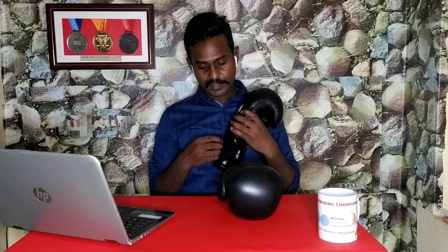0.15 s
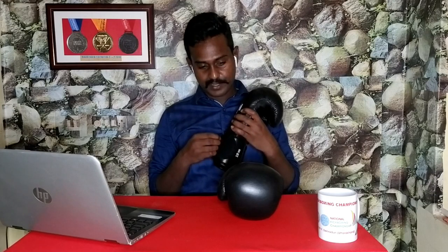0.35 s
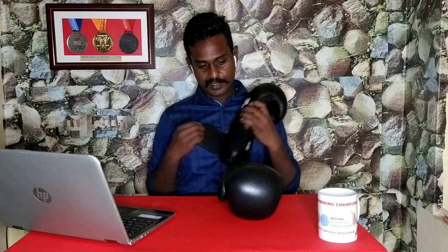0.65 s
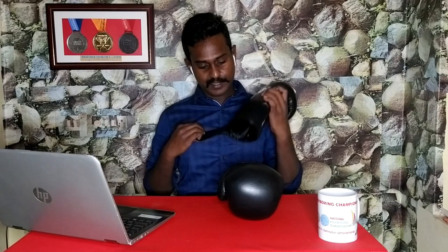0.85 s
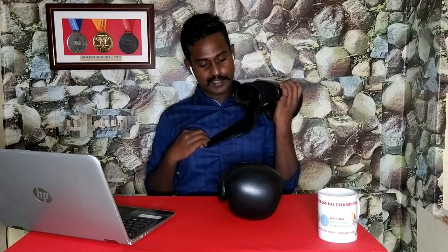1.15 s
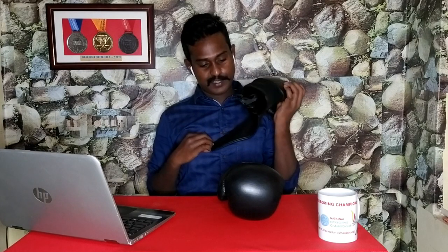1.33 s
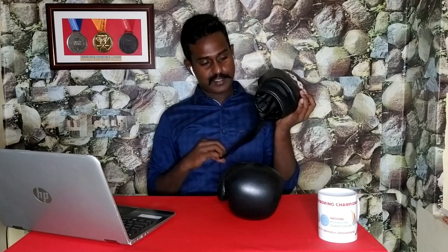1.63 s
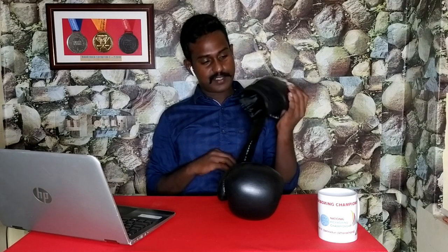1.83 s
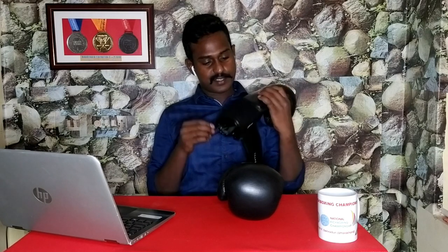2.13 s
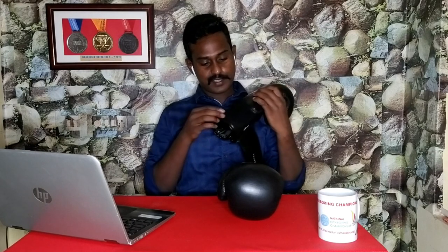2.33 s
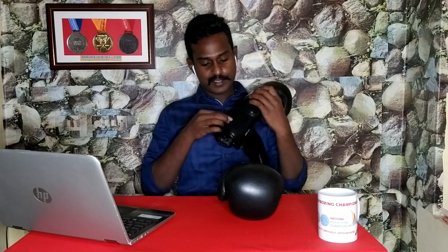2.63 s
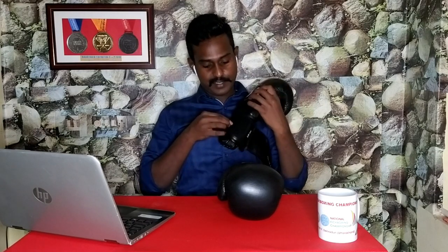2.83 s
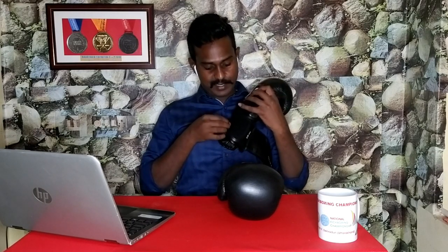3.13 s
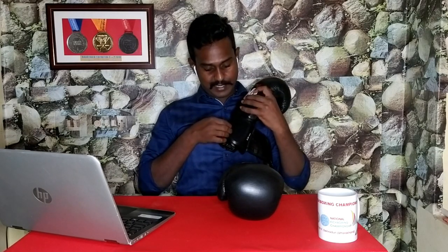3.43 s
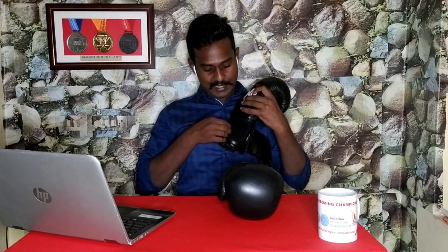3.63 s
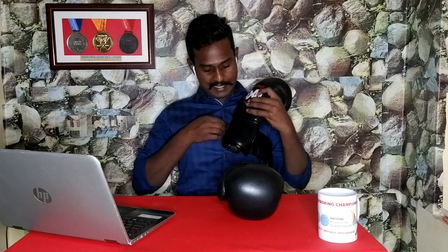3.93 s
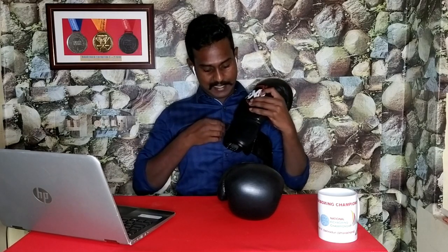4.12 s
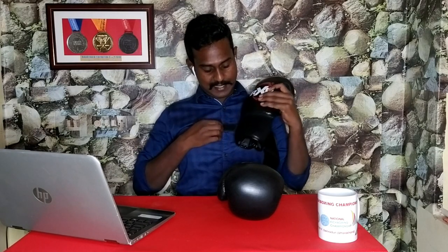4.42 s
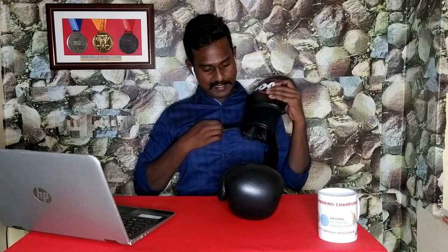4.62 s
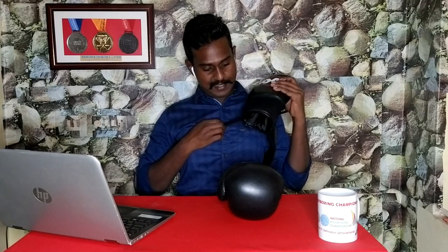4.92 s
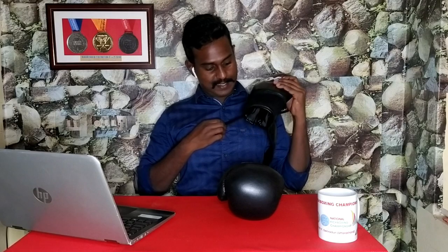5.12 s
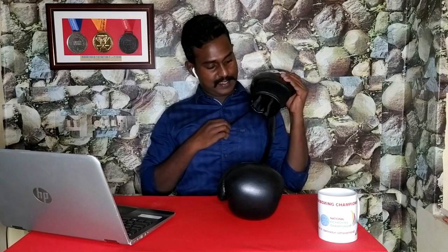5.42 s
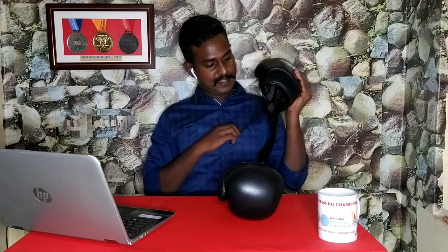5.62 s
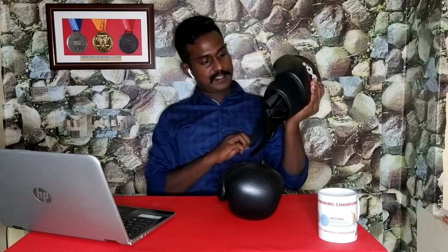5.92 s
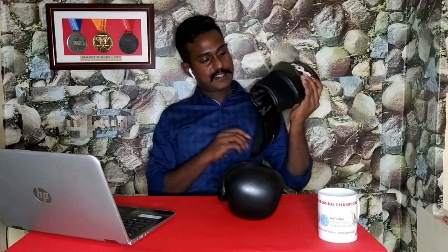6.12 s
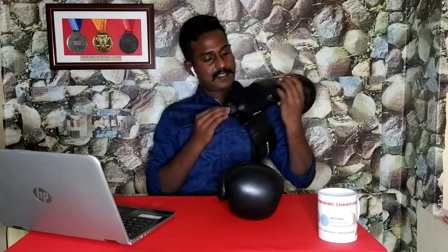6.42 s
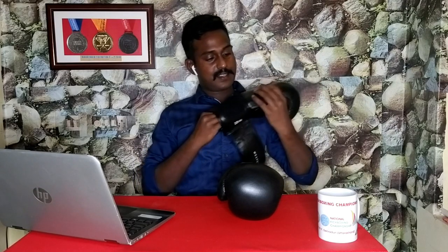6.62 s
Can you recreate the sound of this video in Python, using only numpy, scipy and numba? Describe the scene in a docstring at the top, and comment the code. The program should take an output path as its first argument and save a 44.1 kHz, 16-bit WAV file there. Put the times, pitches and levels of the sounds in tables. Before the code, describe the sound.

The hook-and-loop wrist strap of a boxing glove catches with a few sharp pops, then tears open in a crackling rip of about a second. Faint finger taps and rustles follow as the glove is handled. A second, longer rip comes in uneven tugs and thins out. The microphone listens from across a table in a small, hard-walled room with a faint low drone.

```python
"""A boxing glove's hook-and-loop wrist strap is ripped open twice, in a string of tugs.
Thousands of hooks snap free; each ticks, flicks the strap and thumps the padded cuff.
Single hooks pop before, during and between tugs; around the rips the glove is handled softly.
Small hard-walled room with a low steady drone; a two-port phone listens from across the table."""
import sys
import numpy as np
from scipy import signal
from scipy.fft import rfft, irfft
from scipy.io import wavfile
from scipy.ndimage import uniform_filter1d
from numba import njit

SR = 44100
rng = np.random.default_rng(int(sys.argv[2]) if len(sys.argv) > 2 else 0)


def put_to_file(sound):
    """Save the sound as 16-bit audio at rate SR, in the file named by the first command-line argument."""
    columns = np.atleast_2d(sound).T  # one column per channel
    safe = np.clip(columns, -1, 1)
    whole_steps = np.round(safe * 32767)
    wavfile.write(sys.argv[1], SR, whole_steps.astype(np.int16))


N = 298111
TOP_HZ = 15800
TIME, FREQ = np.arange(N) / SR, np.fft.rfftfreq(N, 1 / SR)
LEFT_RIGHT = np.array([[1], [-1]])

# strap tugs: t/s, build/s, hold/s, ease/s, level/dB, flap re level/dB, cuff re level/dB, stubborn/(1/s)
TUGS = [ (0.206, .003, 0.023, 0.032, -51, 1.5, -3, 10), (0.298, 0.018, 0.0052, 0.05, -44, -2, -9, 5),
        (0.336, .006, 0.018, .04, -43, -5, -9, 5), (0.368, 0.011, 0.009, 0.047, -34, -5, -12, 80),
        (0.508, 0.041, 0.017, 0.19, -28, -8, -12.5, 90),
        (0.692, 0.084, 0.0089, 0.054, -23, -9.5, -13.5, 40), (0.78, 0.013, 0.14, 0.091, -33, -0.5, -12, 40),
        (1.012, 0.0089, 0.013, 0.18, -31, -7, -15, 50), (1.105, 0.025, 0.048, 0.12, -30.5, -6, -14, 20),
        (1.187, 0.02, 0.0093, .03, -30, -1, -9.5, 10), (3.69, .004, 0.12, 0.3, -45.5, -5.5, -16.5, 15),
        (3.817, 0.016, 0.11, 0.15, -29, -6.5, -15.5, 80), (3.945, 0.031, 0.074, 0.07, -30, -10, -13.5, 25),
        (4.094, .018, 0.011, 0.07, -35, -11, -15.5, 50), (4.228, 0.0031, 0.035, .12, -44, -8.5, -10.5, 3),
        (4.273, 0.035, 0.14, 0.14, -28, -13.5, -13.5, 30),
        (4.592, 0.027, 0.11, 0.12, -30.5, -12.5, -13.5, 15),
        (4.825, 0.0064, 0.017, 0.096, -38.5, -12.5, -10.5, 3),
        (4.933, 0.0033, 0.011, 0.22, -35, -12, -12, 3), (5.014, 0.019, 0.017, 0.2, -32.5, -11, -11.5, 3),
        (5.115, 0.026, 0.028, 0.09, -38, -12.5, -12.5, 3),
        (5.243, 0.0027, 0.005, 0.052, -41.5, -12, -12, 3), (5.288, 0.028, .01, 0.12, -46.5, -9, -8.5, 3),
        (5.339, 0.022, 0.0085, 0.12, -31, -10, -11.5, 3), (5.46, 0.034, .005, 0.087, -30.5, -10, -10.5, 3),
        (5.605, 0.032, 0.0098, 0.084, -34, -10, -7, 3), ]


def ripping(gains, hook_damping=0.61, strap_damping=0.52, cuff_damping=0.38,
            hook_db=-2, flap_db=-3, cuff_db=-2):
    """The same snaps excite hooks, taut strap and cuff; resonances shift as the free strap lengthens."""
    # resonances along the peel: t/s, hook f/Hz, strap f/Hz, cuff f/Hz, cuff ring gain
    peel = [(0.37, 6840, 3270, 990, 2.2), (0.57, 6040, 3670, 1000, 5.2), (0.77, 6490, 3780, 1140, 1.4),
            (0.9, 6600, 4200, 1740, 1.5), (1.04, 6940, 4100, 1957, 0.64), (1.2, 6190, 3200, 1880, 1.4),
            (3.87, 6240, 3746, 982, 0.47), (4.05, 6590, 3180, 1080, 3.3), (4.4, 7730, 2660, 1010, 1.2),
            (4.7, 7750, 2170, 1480, 1.5), (5.05, 7030, 2550, 1800, 0.9), (5.38, 7540, 2190, 1900, 0.54),
            (5.51, 6650, 2400, 650, 0.5), (5.65, 6800, 2360, 1120, 0.37)]
    # hook tick spectrum: f/Hz, level/dB
    hook_spectrum = [(2000, 2), (4000, 6), (4900, -0.5), (7300, 0), (10000, 3), (12000, 0.5), (16000, -5)]
    # cuff thump spectrum: f/Hz, level/dB
    cuff_spectrum = [(30, -12.5), (60, -10), (150, -6.5), (205, -2), (270, -5.5), (315, 6), (370, 0),
                     (560, 1.5), (1000, 0.5), (1400, 0.5), (2000, 3.5), (3200, -15), (6000, -28.5),
                     (14000, -64.5)]
    times_s, *columns = np.transpose(peel)
    hook_hz, strap_hz, cuff_hz, cuff_ring = (np.interp(TIME, times_s, c) for c in columns)
    hook_hz = np.minimum(hook_hz * np.exp(.1 * walk(150)), TOP_HZ)  # rows differ in pitch
    strap_hz = np.minimum(strap_hz * np.exp(.07 * walk(200)), TOP_HZ)  # tension flutters
    hook_gain, flap_gain, cuff_gain = gains * undb([[hook_db], [flap_db], [cuff_db]])
    out = []
    for train in snaps():
        _, ticks = resonator(train, hook_hz, hook_damping)
        _, ticks = resonator(ticks, 0.75 * hook_hz, 1.0)  # a tiny hook radiates little below its pitch
        hooks = unit(colour(ticks, hook_spectrum))
        flap, _ = resonator(train, strap_hz, strap_damping)
        flap, _ = resonator(flap, strap_hz, strap_damping)
        ring, _ = resonator(train, cuff_hz, cuff_damping)
        cuff = colour(train + cuff_ring * ring, cuff_spectrum)
        out.append(hook_gain * hooks + flap_gain * steady(flap, 0.11) + cuff_gain * steady(cuff, 0.19))
    return np.array(out)


def snaps(first_per_s=950, last_per_s=3000, scatter_db=3.5, bunch_db=1.17, aim_db=4):
    """Hooks let go at random, bunched by row, denser as a rip goes on; each favours one port."""
    # rips: start t/s, end t/s
    rips = [(0.2, 1.25), (3.7, 5.7)]
    progress = np.interp(TIME, np.ravel(rips), [0, 1] * len(rips))
    rate_per_s = first_per_s * (last_per_s / first_per_s) ** progress
    released = rng.random(N) < rate_per_s / SR
    force_db = scatter_db * np.clip(rng.standard_normal(N), -2, 1)
    row_db = bunch_db * np.clip(walk(260), -2, 2)
    aim = undb(aim_db * LEFT_RIGHT * rng.uniform(-1.5, 1.5, N))
    aim /= np.sqrt(np.mean(aim ** 2, axis=0))
    train = released * undb(force_db + row_db) * rng.choice([-1, 1], N)
    return aim * steady(train, window_s=0.02)  # the pulling hand keeps mean power steady


def pull(attack_s=0.00076, catch_db=-8, ease_db=-28, jerk_db=3.5, jerk_s=0.0071):
    """Hook, flap and cuff gains: each tug catches, builds, holds and eases; the strongest rules."""
    gains = np.zeros((3, N))
    for start_s, build_s, hold_s, ease_s, level_db, flap_db, cuff_db, _ in TUGS:
        span = (TIME > start_s - attack_s) & (TIME < start_s + build_s + hold_s + 3 * ease_s)
        t = TIME[span] - start_s
        shape_db = catch_db * np.clip(1 - t / build_s, 0, 1)
        shape_db += ease_db * np.maximum(t - build_s - hold_s, 0) / ease_s
        shape_db += jerk_db * np.exp(-np.abs(t) / jerk_s)  # first rows give way at once
        tug = np.sqrt(np.clip(1 + t / attack_s, 0, 1)) * undb(level_db + shape_db)
        gains[:, span] = np.maximum(gains[:, span], np.outer(undb([0, flap_db, cuff_db]), tug))
    return gains


def stubborn_hooks(hook_gain, over_db=7.5, scatter_db=2.0, flap_db=-5, flap_scatter_db=3):
    """Stubborn hooks crackle above the tearing at each tug's rate; rows of t/s, peak/dB, flap/dB."""
    chance, force, flap = rng.random(N), rng.uniform(-2, 2, N), rng.uniform(-2, 2, N)
    starts_s, *_, tug_per_s = np.transpose(TUGS)
    rate_per_s = tug_per_s[np.searchsorted(starts_s, TIME) - 1]
    at = np.flatnonzero((chance < rate_per_s / SR) & (hook_gain > 0))
    peak_db = 20 * np.log10(hook_gain[at]) + over_db + scatter_db * force[at]
    return list(zip(TIME[at], peak_db, flap_db + flap_scatter_db * flap[at]))


def popping(stubborn, shiver_gain=0.13, shiver_s=0.0006, cuff_hz=2700, flap_hz=3850, hook_hz=7100,
            aim_db=2, port_lag_s=.000018, size=1024):
    """Lone hooks: one sharp flick each, at its own pitch and place, then the freed loop shivers."""
    # hooks popping as the strap is taken up or snags: t/s, peak/dB, flap/dB
    lone_pops = [ (0.166, -50, 4), (0.185, -42.5, 6), (0.2053, -20, 10.5), (0.2218, -20, 7.5),
                 (0.228, -20, 14), (0.2958, -20.5, 2), (0.299, -18.5, 0), (0.309, -17, 4.5),
                 (0.313, -16.5, 3), (0.335, -17, -3.5), (0.342, -17.5, -1.5), (0.3615, -22, -3.5),
                 (0.3685, -14.5, -3), (0.376, -17, -3), (0.382, -19, -4), (0.5065, -16, -8.5),
                 (0.514, -17, -5), (0.549, -17, -4), (0.582, -16, -3.5), (0.610, -17.5, -6.5),
                 (0.672, -21.5, -4), (0.693, -20.5, 5.5), (0.7775, -9.5, -3), (1.0106, -19.5, 6),
                 (1.0255, -20, 2), (1.1128, -24, 8.5), (1.123, -21, 6), (1.6457, -51, -10),
                 (3.2205, -49, 15), (3.279, -47, 3), (3.3016, -40, -2), (3.5055, -25.5, 7),
                 (3.6697, -25, -1.5), (3.698, -21.5, 2), (3.7243, -27.5, -7.5), (3.7643, -25, 1),
                 (3.7877, -23, 3), (3.8137, -17.5, 0.5), (3.828, -15, 12), (3.8412, -14, 4),
                 (3.8513, -14.5, 3), (3.8785, -17, -11), (3.9057, -13.5, -5.5), (3.909, -13, 8),
                 (3.934, -16, -3.5), (3.9728, -12, -10), (4.0405, -13.5, -25.5), (4.091, -19.5, -20),
                 (4.101, -18, -11.5), (4.118, -17.5, -18), (4.1866, -20.5, -17), (4.2315, -20.5, -21),
                 (4.2788, -21.5, -9), (4.2935, -15, -7), (4.5365, -30.5, -8), (4.591, -30, -5),
                 (4.6025, -34, -9), (4.657, -18, -13), (4.673, -19, -11), (4.806, -28, -10),
                 (4.834, -20, -10), (4.934, -29, -10), (5.2418, -33, -10), (5.338, -27, -7),
                 (5.462, -25, -4), (5.607, -32, -6), ]
    # pop spectrum: f/Hz, level/dB
    pop_spectrum = [(100, -26), (500, -15), (2400, -7), (3600, -4.5), (4900, -2), (7000, 0.5), (10000, 2.5),
                    (12000, -4.5), (16000, -17.5)]
    out, t = np.zeros((2, N)), np.arange(size) / SR
    for start_s, peak_db, flap_db in lone_pops + stubborn:
        shiver = shiver_gain * rng.standard_normal(size) * np.exp(-t / shiver_s)
        stiffness, aim, place = np.clip(rng.standard_normal(3), -1.5, 1.5)
        detune = np.exp(0.11 * stiffness)
        pitch_hz = hook_hz * detune
        hook_peak = [(.75 * pitch_hz, -5), (pitch_hz, 0), (1.3 * pitch_hz, -5)]
        pop = colour((t == 0) + shiver, pop_spectrum)
        pop = colour(pop, [(cuff_hz, -6), (flap_hz * detune, flap_db)] + hook_peak)
        for _ in range(3):  # all-passes: the limp strap disperses the flick
            pop = signal.lfilter([.5, -.8, 1], [1, -.8, .5], pop)
        pop /= np.abs(pop).max()
        for port, side in zip(out, (1, -1)):
            add(port, start_s + side * place * port_lag_s / 2, undb(peak_db + side * aim * aim_db) * pop)
    return out


def finger_taps(gain_db=-2, decay_s=0.0043, size=2048):
    """Fingers tap the padded glove: short dull noise bursts."""
    # taps: t/s, peak before gain/dB
    taps = [(1.506, -55.5), (1.56, -45.5), (1.963, -54), (3.368, -42.5), (3.456, -46.5), (3.611, -43),
            (5.897, -51.5)]
    # tap spectrum: f/Hz, level/dB
    tap_spectrum = [(80, -7), (350, 3.5), (800, 5.5), (2000, -2.5), (6000, -7.5), (12000, -19)]
    out, t = np.zeros(N), np.arange(size) / SR
    for start_s, peak_db in taps:
        tap = colour(rng.standard_normal(size) * np.exp(-t / decay_s), tap_spectrum)
        add(out, start_s, undb(peak_db + gain_db) * tap / np.abs(tap).max())
    return out


def sliding(gain_db=-3, grit_db=4):
    """Glove and sleeve slide under the hands: faint gritty noise that swells and fades."""
    # moves: t/s, swell/s, fade/s, level before gain/dB
    slides = [(0.0, 0.065, 0.091, -58), (1.643, 0.0029, 0.031, -58), (1.91, 0.054, 0.024, -62.5),
              (2.08, 0.035, 0.031, -65), (2.71, 0.055, 0.074, -65.5), (2.8, 0.061, 0.039, -64),
              (3.19, 0.04, 0.089, -69), (3.295, .015, 0.085, -61.5), (5.84, 0.068, 0.031, -65.5),
              (6.18, 0.018, 0.023, -70.5), (6.68, 0.066, .05, -66)]
    # friction spectrum: f/Hz, level/dB
    slide_spectrum = [(300, -23), (1500, -1.5), (3500, 2), (6000, -1), (8500, 2.5), (12000, 1),
                      (16000, -5.5)]
    grit = unit(colour(rng.standard_normal(N) * undb(grit_db * walk(600)), slide_spectrum))
    envelope = np.zeros(N)
    for start_s, swell_s, fade_s, level_db in slides:
        t = TIME - start_s
        fade = np.exp(-np.maximum(t - swell_s, 0) / fade_s)
        envelope += undb(level_db + gain_db) * np.clip(t / swell_s, 0, 1) * fade
    return grit * envelope


def room(x, wet_db=0.62, positions=12):
    """Direct sound plus reverberation whose pattern changes as the glove moves."""
    place, wet = np.linspace(0, positions - 1, N), np.zeros((2, N))
    direct = signal.unit_impulse(SR // 2)
    for k in range(positions):
        near = np.flatnonzero(np.abs(place - k) < 1)
        crossfaded = x[:, near] * np.sqrt(1 - np.abs(place[near] - k))
        for port, sound, tail in zip(wet, crossfaded, room_tails()):
            reflections = level_bands(direct + undb(wet_db) * tail) - direct
            add(port, TIME[near[0]], signal.fftconvolve(sound, reflections))
    return x + wet


def room_tails(near_gain=0.91, near_s=0.0034, build_s=0.00078, shared_hz=750, bands=13):
    """One unit-energy tail per port; long waves reach both ports alike."""
    # reverberation time: f/Hz, T60/s
    room_t60 = [(200, 0.23), (800, 0.37), (2000, 0.35), (5500, 0.34), (12000, 0.31)]
    t, freq = np.arange(SR // 2) / SR, np.fft.rfftfreq(SR // 2, 1 / SR)
    edges_hz = np.geomspace(30, TOP_HZ, bands + 1)
    mid, side = rfft(rng.standard_normal((2, len(t))))
    apart = np.minimum(freq / shared_hz, 1) ** 2
    spectrum = (mid + apart * side * LEFT_RIGHT) / np.sqrt(1 + apart ** 2)
    tail = np.zeros((2, len(t)))
    for lo, hi in zip(edges_hz, edges_hz[1:]):
        band = irfft(spectrum * (freq >= lo) * (freq < hi), len(t))
        tail += band * undb(-60 * t / at_hz(room_t60, np.sqrt(lo * hi)))
    # glove, chest and table answer first and comb the spectrum
    tail *= (1 - np.exp(-t / build_s)) * (1 + near_gain * np.exp(-t / near_s))
    return tail / np.linalg.norm(tail, axis=1, keepdims=True)


def level_bands(response, bands=24):
    """Flatten a response in third octaves: fine colouring stays, no boom."""
    power, freq = np.abs(rfft(response)) ** 2, np.fft.rfftfreq(len(response), 1 / SR)
    edges_hz = np.geomspace(60, TOP_HZ, bands + 1)
    centres_hz = np.sqrt(edges_hz[1:] * edges_hz[:-1])
    band_power = np.array([power[(freq >= lo) & (freq < hi)].mean()
                           for lo, hi in zip(edges_hz, edges_hz[1:])])
    excess_db = 10 * np.log10(band_power / power[freq < TOP_HZ].mean())
    return colour(response, np.column_stack([centres_hz, -excess_db]), size=4096)


def background(drone_db=-65, hiss_db=-72, waver_db=2):
    """Fan-like drone with wavering tones, much alike in both ports, under a thin wide hiss."""
    # drone tones: f/Hz, rms level/dB
    tones = [(97.5, -78.5), (103.5, -80), (165, -80), (330, -78), (450, -77)]
    # drone spectrum: f/Hz, level/dB
    drone_spectrum = [(20, -26.5), (43, -11), (69, -12), (82, -14), (102, 2), (134, -9.5), (165, -3),
                      (260, -7.5), (334, -7), (400, -11), (460, -4), (650, -22), (1000, -29), (2000, -56)]
    # hiss spectrum: f/Hz, level/dB
    hiss_spectrum = [(200, -12.5), (700, 8), (1200, 4), (2400, 1), (5000, -1.5), (8500, -0.5),
                     (12000, -1.5), (16000, -16.5)]
    hum = np.zeros(N)
    for hz, level_db in tones:
        amplitude = np.sqrt(2) * undb(level_db + waver_db * walk(4.3))
        hum += amplitude * np.sin(2 * np.pi * hz * TIME + walk(14))
    drone = undb(drone_db) * stereo_noise(drone_spectrum, width=0.48)
    hiss = undb(hiss_db) * stereo_noise(hiss_spectrum, width=1.0)
    return drone + hum + hiss


def stereo_noise(spectrum, width):
    """Coloured mid/side noise."""
    mid, side = (unit(colour(rng.standard_normal(N), spectrum)) for _ in range(2))
    return mid + width * side * LEFT_RIGHT


@njit
def resonator(x, hz, damping):
    """State-variable filter with moving centre; returns band-pass, high-pass."""
    out, band_state, low_state = np.empty((2, len(x))), 0., 0.
    for i in range(len(x)):
        g = np.tan(np.pi * hz[i] / SR)
        band = (band_state + g * (x[i] + 1e-18 - low_state)) / (1 + g * (g + damping))
        out[0, i] = damping * band
        out[1, i] = x[i] - damping * band - (low_state + g * band)
        band_state, low_state = 2 * band - band_state, low_state + 2 * g * band
    return out


def colour(x, spectrum, size=2048):
    """Minimum-phase filter from (f/Hz, level/dB) points; clicks keep their sharp front."""
    cepstrum = irfft(np.log(undb(at_hz(spectrum, np.fft.rfftfreq(size, 1 / SR)))))
    cepstrum[1:size // 2] *= 2
    cepstrum[size // 2 + 1:] = 0
    return signal.fftconvolve(x, irfft(np.exp(rfft(cepstrum))))[:len(x)]


def at_hz(points, hz):
    """Read a table on a log-frequency axis."""
    f, value = np.transpose(points)
    return np.interp(np.log(hz + 1), np.log(f), value)


def walk(rate_hz):
    """Random levels joined by straight lines; spread near 1."""
    knots = rng.standard_normal(int(N / SR * rate_hz) + 2)
    return np.sqrt(3 / 2) * np.interp(TIME * rate_hz, np.arange(len(knots)), knots)


def steady(x, window_s):
    """Hold the running rms at 1."""
    return x / np.sqrt(np.abs(uniform_filter1d(x ** 2, int(window_s * SR))) + 1e-9)


def unit(x):
    """Scale to rms 1."""
    return x / np.sqrt(np.mean(x ** 2))


def undb(db):
    """Decibels to gain."""
    return 10 ** (np.asarray(db) / 20)


def add(track, start_s, sound):
    """Mix a short sound into a track."""
    start = int(start_s * SR)
    track[start:start + len(sound)] += sound[:N - start]


def scene():
    """Strap and glove in the room, over the drone."""
    gains = pull()
    strap = ripping(gains) + popping(stubborn_hooks(gains[0]))
    return room(strap + finger_taps() + sliding()) + background()


def record(dry, shelf_hz=12150, shelf_db=-15.0):
    """Each port colours the treble. The treble drops about 15 dB above 12 kHz and ends near 16 kHz."""
    # microphone port mismatch: f/Hz, left minus right/dB
    mismatch = [(100, 0), (2400, 0.5), (5500, -.5), (7500, -4), (9500, -2), (10700, 0.5), (12000, 10.5),
                (16000, 18)]
    ports = undb(LEFT_RIGHT / 2 * at_hz(mismatch, FREQ))
    shelf = np.interp(FREQ, [shelf_hz - 200, shelf_hz + 100], [1, undb(shelf_db)])
    heard = irfft(rfft(dry) * ports * shelf, N)
    return signal.sosfilt(signal.ellip(10, .2, 80, TOP_HZ, fs=SR, output="sos"), heard)


dry = scene()
out = record(dry)
put_to_file(out)
```